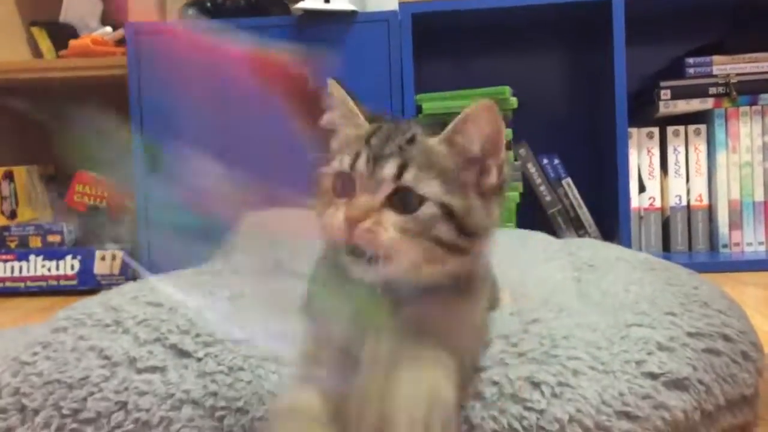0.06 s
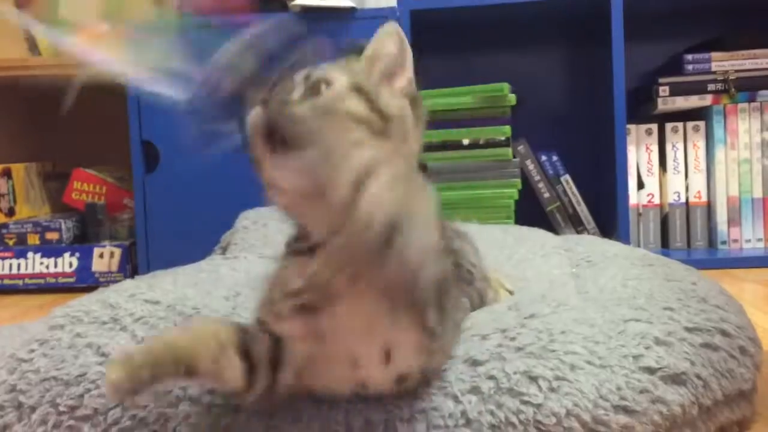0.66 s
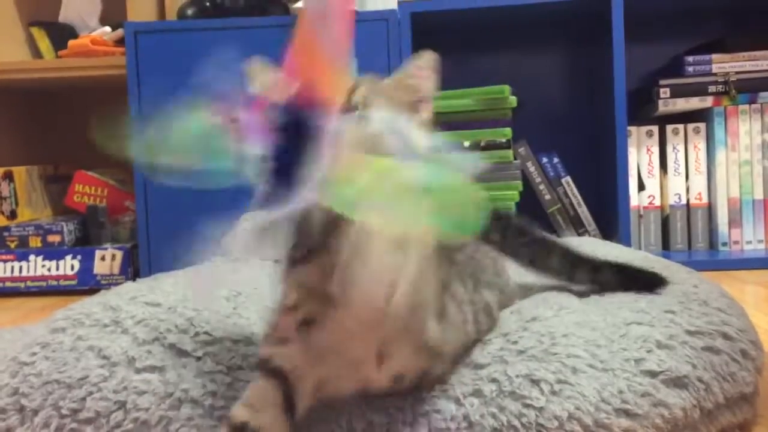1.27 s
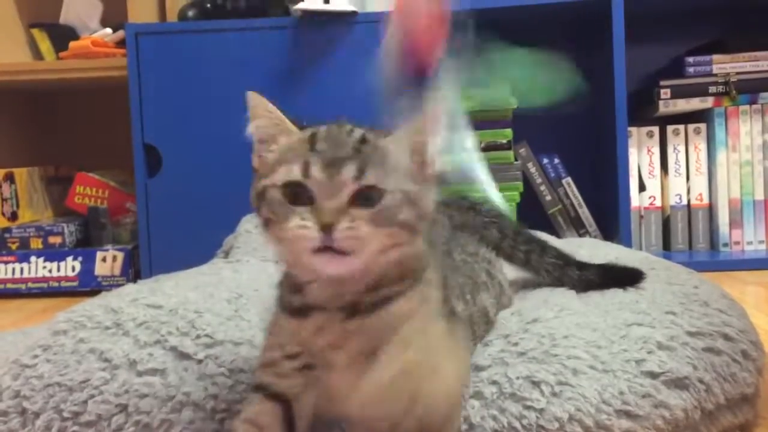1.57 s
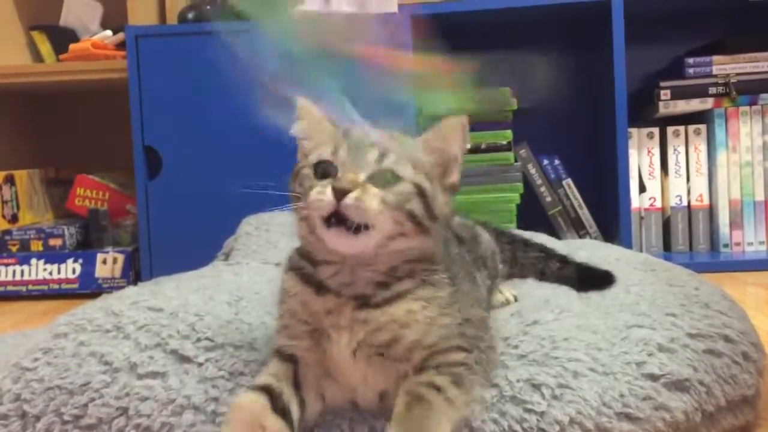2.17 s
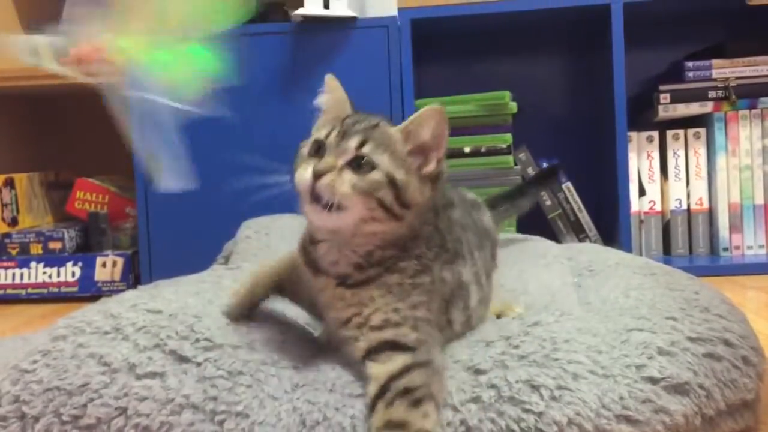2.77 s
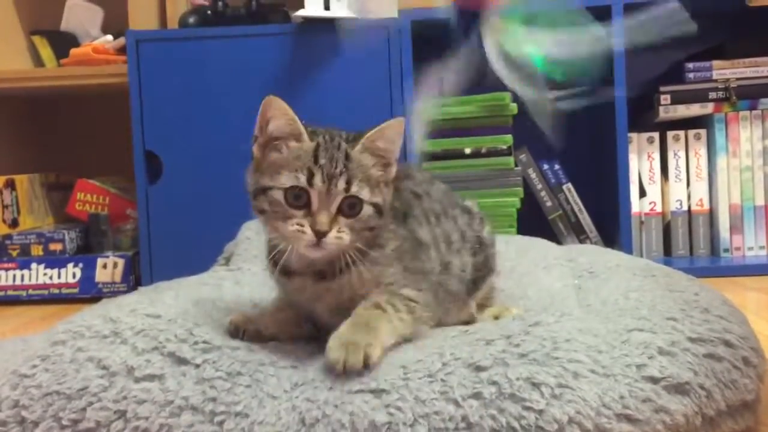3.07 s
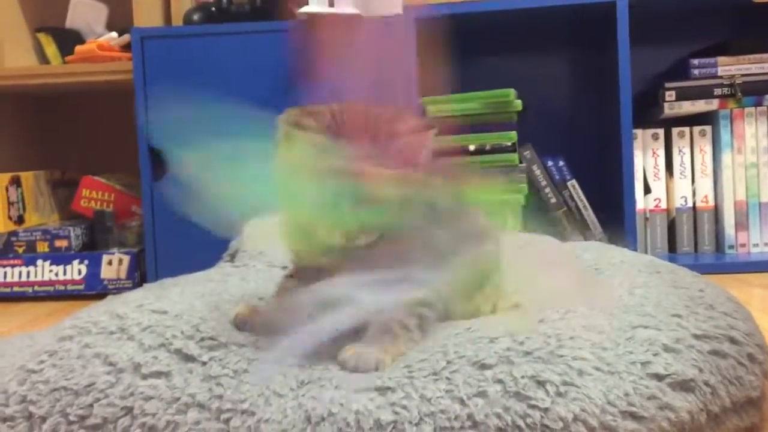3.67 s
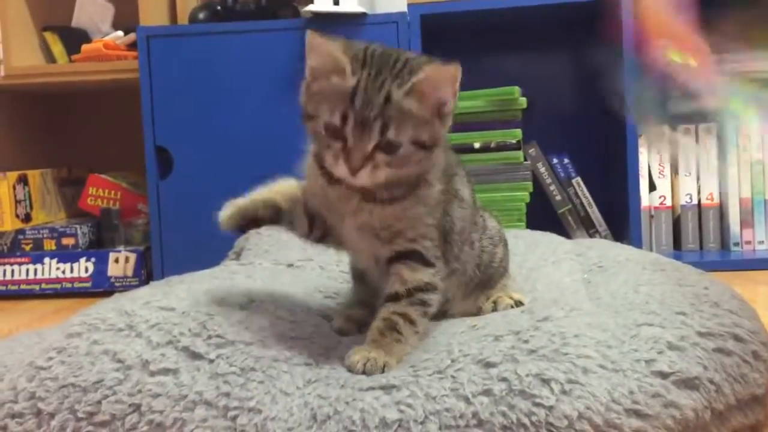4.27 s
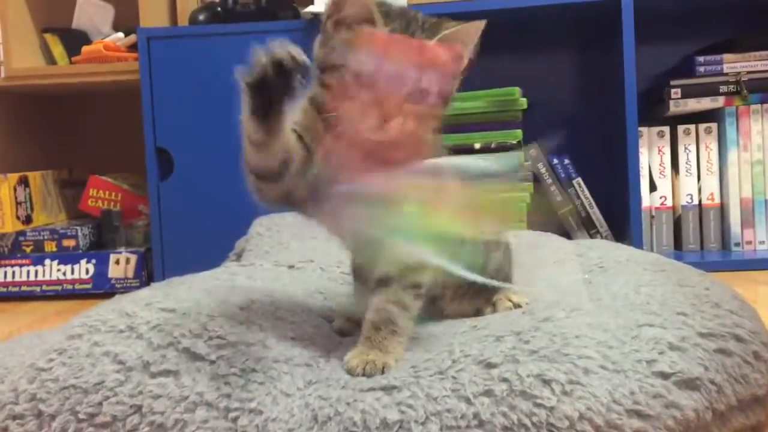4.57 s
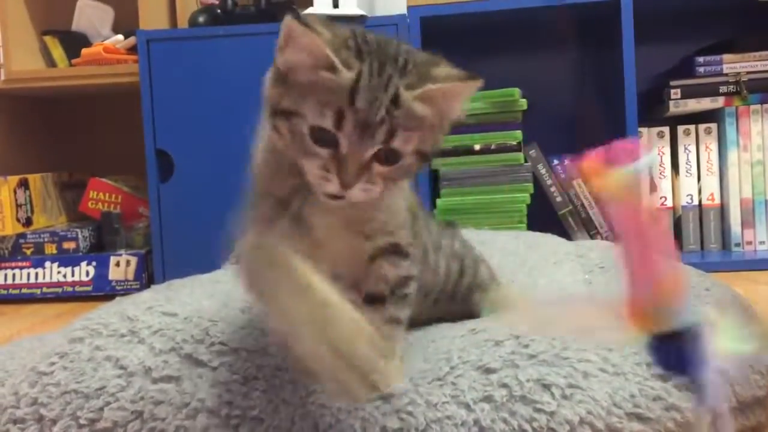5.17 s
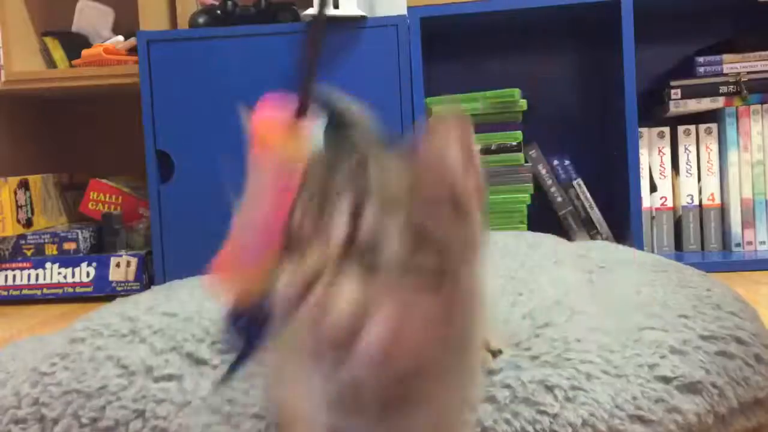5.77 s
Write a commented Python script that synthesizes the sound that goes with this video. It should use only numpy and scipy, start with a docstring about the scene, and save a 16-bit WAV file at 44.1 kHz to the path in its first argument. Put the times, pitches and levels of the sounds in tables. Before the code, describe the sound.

A feathered foil wand toy swishes and crinkles in bursts as a kitten bats it, with light clicks and soft paw pats.

```python
"""A crisp swish of foil comes first: a feathered wand toy with thin streamers, swung over a kitten.
Each swing crumples the streamers, single folds snap and hard parts click; then the streamers slide
and settle. Underneath, the kitten's paws pat and scuff on a plush cushion. One microphone, close to
the play in a small furnished room, with a quiet rumble and mains hum behind it."""
import sys
import numpy as np
from scipy import signal
from scipy.fft import rfft, irfft, next_fast_len
from scipy.io import wavfile
from scipy.ndimage import uniform_filter1d, map_coordinates

SR = 44100
rng = np.random.default_rng(int(sys.argv[2]) if len(sys.argv) > 2 else 0)


def to_wav(s):
    """Save 16-bit WAV."""
    ch = np.atleast_2d(s).T  # columns
    pcm = np.round(np.clip(ch, -1, 1) * 32767)  # PCM
    wavfile.write(sys.argv[1], SR, pcm.astype(np.int16))


N = 257103


def amp(db):
    """Decibels to gain."""
    return 10 ** (np.asarray(db) / 20)


def unit(x):
    """x at rms 1."""
    return x / np.sqrt(np.mean(x ** 2) + 1e-20)


def along(points, hz):
    """(Hz, value) points read on a log axis."""
    f, v = np.transpose(points)
    return np.interp(np.log(hz + 1), np.log(f), v)


def hump(hz, centre_hz, octaves):
    """A spectral peak that halves in gain the given octaves from its centre."""
    return 1 / (1 + (np.log2((hz + 1) / centre_hz) / octaves) ** 2)


def filtered(x, response):
    """x through a gain that depends on frequency."""
    n = x.shape[-1]
    padded = next_fast_len(n + 4096)
    return irfft(rfft(x, padded) * response(np.fft.rfftfreq(padded, 1 / SR)), padded)[..., :n]


def add(track, s, sound):
    """Mix a sound into the track from time s on."""
    i = round(s * SR)
    part = sound[max(-i, 0):max(N - i, 0)]
    track[max(i, 0):max(i, 0) + len(part)] += part


def swell(rise, fall):
    """An envelope and the time of its peak; rise and fall are the seconds for 20 dB either side."""
    lead = 2 * max(rise, 1 / SR)
    t = np.arange(-lead, 3 * abs(fall) + .002, 1 / SR)
    return amp(-20 * np.where(t < 0, np.abs(t / rise) ** 1.07, t / fall)), lead


def wobble(rate):
    """A smooth random curve, rate knots a second."""
    return map_coordinates(rng.standard_normal(1024), [np.arange(N) * rate / SR], mode="mirror")


def crackle(n, rate, spread_db, friction):
    """Tiny buckles of very unequal size at random moments, over smooth friction noise."""
    impulses = (rng.random(n) < rate / SR) * rng.choice([-1, 1], n)
    sizes = amp(spread_db * rng.standard_normal(n).clip(-2, 2))
    return unit(unit(impulses * sizes) + friction * rng.standard_normal(n))


# Room tone at the microphone. Each row: frequency in Hz, relative level in dB.
ROOM_TONE = [(12, -57), (20, -37), (40, -5), (65, -5.5), (187, -9.5), (216, -13), (262, -9), (301, -16),
             (337, -17), (434, -22), (527, -19), (590, -21.5), (5080, -36), (8890, -38), (16000, -37.5)]


def background():
    """Room rumble, microphone hiss and a faint 60 Hz mains hum."""
    air = unit(filtered(rng.standard_normal(N), lambda hz: amp(along(ROOM_TONE, hz))))
    hum = np.sin(2 * np.pi * 60 * np.arange(N) / SR)
    return amp(-67.5) * air + amp(-78) * hum


# The small room's short decay. Each row: frequency in Hz, seconds to fall 60 dB.
ROOM_DECAY = [(200, 0.27), (1500, 0.2), (5000, 0.12), (14000, 0.17)]


def room(x, stretches=16):
    """Nearby shelves and walls answer differently as the toy moves; the treble dies first."""
    out = np.zeros(N)
    for piece in np.array_split(np.arange(N), stretches):
        hz, t, noise = signal.stft(rng.standard_normal(SR // 3), SR, nperseg=256)
        decay = amp(-60 * t / along(ROOM_DECAY, hz)[:, None])
        tail = signal.istft(noise * decay, SR, nperseg=256)[1]
        add(out, piece[0] / SR + .003, signal.fftconvolve(x[piece], tail / np.linalg.norm(tail)))
    return out


# Low rumble from the cushion. Each row: frequency in Hz, relative level in dB.
CUSHION_RUMBLE = [(30, -28.5), (60, 6), (100, -5), (200, -6.5), (500, -50), (2000, -83)]


def shuffle(stir_db):
    """The kitten shifts its weight as it goes for the toy: a faint rumble that follows the foil."""
    rumble = unit(filtered(rng.standard_normal(N), lambda hz: amp(along(CUSHION_RUMBLE, hz))))
    effort_db = .5 * (uniform_filter1d(stir_db, size=6600) + 44.5)
    return amp(-67.5 + effort_db) * rumble


# Resonances of a scuff. Each row: frequency in Hz, width in Hz, relative level in dB.
PLUSH_MODES = [(175, 105, -4), (356, 45, 0), (677, 82, -3.5), (820, 80, 0), (1410, 460, -13)]
# Paws dragging through the plush. Each row: peak time in seconds, level in dB, rise and fall in seconds.
PAW_SCUFFS = [(.768, -51.5, .03, 0.056), (.815, -48, 0.037, 0.075), (5.762, -48, .02, 0.1),
              (5.825, -50.5, 0.018, 0.045)]


def scuffs():
    """Claws catch and slip in the pile of the cushion."""
    def plush(hz):
        modes = sum((-1) ** k * amp(db) * 1j * hz * width / (centre ** 2 - hz ** 2 + 1j * hz * width)
                    for k, (centre, width, db) in enumerate(PLUSH_MODES))
        return modes / (1 + (hz / 2200) ** 4)

    out = np.zeros(N)
    for s, db, rise, fall in PAW_SCUFFS:
        shape, lead = swell(rise, fall)
        slips = crackle(len(shape), rate=400, spread_db=4, friction=.6)
        add(out, s - lead, amp(db) * shape * unit(filtered(slips, plush)))
    return out


# Paws and toy landing on the cushion. Each row: time in seconds, relative level in dB, pitch in Hz.
CUSHION_PATS = [(0.111, -56, 180), (0.223, -51.5, 223), (0.328, -50.5, 125), (0.954, -55, 258),
                (1.154, -55, 102), (1.349, -46, 160), (1.384, -52, 105), (1.472, -48.5, 270),
                (3.892, -53.5, 254), (4.314, -56.5, 121), (4.364, -54, 110), (4.444, -51, 162),
                (4.478, -56, 102), (5.261, -54, 129), (5.608, -52.5, 102)]


def pats():
    """The cushion swallows each blow, leaving a dull puff around one low pitch."""
    out = np.zeros(N)
    shape, lead = swell(rise=.008, fall=.049)
    for s, db, pitch_hz in CUSHION_PATS:
        puff = unit(filtered(rng.standard_normal(len(shape)), lambda hz: hump(hz, pitch_hz, .42)))
        add(out, s + .005 - lead, amp(db - 5) * shape * puff)
    return out


def knock(s, db, pitch_hz, t60):
    """The hollow plastic body of the toy rings briefly as the string jerks it."""
    out, t = np.zeros(N), np.arange(SR // 4) / SR
    add(out, s, amp(db - 60 * t / t60) * np.sin(2 * np.pi * pitch_hz * t))
    return out


# The foil's colour from close by. Each row: frequency in Hz, relative level in dB.
FOIL_COLOUR = [(40, -29), (150, 3), (400, 2.5), (750, -1), (1130, -.5), (1500, -1), (2800, -1), (5000, 0),
               (8000, 1.5), (12500, 0), (16000, -3.5)]


def facets(x, centre_hz, octaves):
    """Foil facets of many sizes radiate x as a broad hump; tighter folds sound higher."""
    return filtered(x, lambda hz: amp(along(FOIL_COLOUR, hz)) * hump(hz, centre_hz, octaves))


def flex(x, depth_db, frame):
    """A bending strip has resonances that last only moments; they recolour the sound at equal power."""
    spectra = signal.stft(x, nperseg=frame)[2]
    resonances = uniform_filter1d(rng.standard_normal(spectra.shape), 5, axis=0)
    resonances = uniform_filter1d(resonances, 3, axis=1)  # each lasts about three frames
    coloured = spectra * amp(depth_db * unit(resonances))
    coloured *= np.linalg.norm(spectra, axis=0) / (np.linalg.norm(coloured, axis=0) + 1e-12)
    return signal.istft(coloured, nperseg=frame)[1][:N]


def ticks(stir_db, rate, db, centre_hz):
    """The thin tips of the streamers flick each other: tiny, very high ticks."""
    out = np.zeros(N)
    shape, lead = swell(rise=.00024, fall=.0018)
    for when, pitch, size in rng.random((int(rate * N / SR), 3)):
        flick = shape * rng.standard_normal(len(shape))
        tick = facets(flick, centre_hz * 2 ** (pitch - .5), octaves=.78)
        add(out, when * N / SR, amp(stir_db[int(when * N)] + db) * size ** 2 * tick)
    return out


def zips(stir_db, rate, db, low_hz, high_hz, mean_s):
    """One edge runs along another, speeding up or slowing down: a short rough chirp."""
    out = np.zeros(N)
    for when, pitch, life, size, way in rng.random((int(rate * N / SR), 5)):
        progress = np.linspace(0, 1, int(SR * mean_s * (.5 + life)))
        speed = np.sin(np.pi / 2 * (progress if way < .65 else 1 - progress))
        hz = (low_hz + (high_hz - low_hz) * speed) * 4 ** (pitch - .5)  # up to an octave either way
        rough_hz = hz * (1 + .29 * rng.standard_normal(len(hz)))
        chirp = np.sin(np.pi * progress) * np.sin(2 * np.pi * np.cumsum(rough_hz) / SR)
        add(out, when * N / SR, amp(stir_db[int(when * N)] + db) * size * chirp)
    return out


# Steady rubbing, strong while the kitten is at the toy. Each row: time in seconds, level in dB.
RUBBING = [(0.0, -65), (0.45, -56), (0.63, -57), (0.78, -74), (0.88, -59), (1.0, -58), (1.21, -56),
           (1.26, -71), (1.42, -52), (1.58, -72), (2.38, -74), (2.78, -78), (3.5, -78), (4.3, -72),
           (4.93, -74), (5.1, -63), (5.48, -62), (5.83, -57)]


def sliding_db():
    """How hard the streamers slide: steady rubbing plus the settling after each swish."""
    power = amp(np.interp(np.arange(N) / SR, *np.transpose(RUBBING))) ** 2
    settling, lead = swell(rise=.028, fall=.058)
    for s, db, _, _ in WAND_SWINGS:
        add(power, s - lead, (amp(db - 15.6) * settling) ** 2)
    flutter_db = 2.5 * wobble(rate=70)  # the streamers catch and let go
    return 10 * np.log10(power) + flutter_db


def sliding(level_db, centre_hz):
    """Loose streamers rub and tick; the colour glides with the tightness of their folds."""
    grains = crackle(N, rate=900, spread_db=6, friction=.72)
    out = np.zeros(N)
    for band_hz in 500 * 2 ** np.arange(6):
        share = np.maximum(1 - np.abs(np.log2(centre_hz / band_hz)), 0)
        out += share * unit(facets(grains, band_hz, octaves=1.15))
    return amp(level_db) * out


# Sharp clicks from the toy. Each row: peak time in seconds, relative level in dB, centre in Hz.
TOY_CLICKS = [(0.0957, -35, 5500), (0.3046, -33, 6500), (0.5852, -32.0, 7500), (0.6985, -51, 7500),
              (0.9014, -40.0, 11000), (0.9629, -31.0, 11000), (1.149, -37.5, 4300), (1.6877, -41.0, 6000),
              (1.8601, -44.5, 9000), (2.0003, -43.5, 11000), (2.2054, -38.0, 10000), (2.9033, -49.0, 5000),
              (3.1304, -54.0, 7500), (4.2026, -35.5, 4200), (4.2259, -34.0, 7500), (4.2821, -51.5, 7500),
              (4.3129, -32.5, 5800), (4.3875, -52, 7500), (4.4511, -30.5, 4600), (4.6958, -27.5, 5800),
              (5.1598, -38.0, 3500), (5.1853, -40.0, 3500), (5.2597, -37.5, 4500), (5.4028, -37.0, 7500),
              (5.4472, -39.0, 12500), (5.5782, -41.5, 12000), (5.6269, -41.0, 7500), (5.7292, -34.0, 5200)]


def clicks(octaves=1.2, rise=.0004, fall=.0026):
    """Hard plastic parts and taut streamer tips click: very sudden bursts for crinkles()."""
    return [(s, db + 1, hz, octaves, rise, fall) for s, db, hz in TOY_CLICKS]


# Single folds popping. Each row: peak time in seconds, relative level in dB, centre in Hz,
# spread in octaves.
FOLD_SNAPS = [(0.0984, -29.0, 4700, 0.97), (0.1176, -22.0, 5400, 0.91), (0.1356, -31.5, 3100, 1.43),
              (0.2003, -37.5, 5100, 1.02), (0.2264, -27, 4400, 0.58), (0.235, -32, 4200, 0.7),
              (0.3049, -32.0, 2500, 1.26), (0.3267, -22.5, 5300, 1.27), (0.349, -32, 4000, 1.1),
              (0.4921, -28.5, 7600, 1.24), (0.5865, -33.5, 6900, 1.41), (0.6199, -39.0, 3700, 0.85),
              (0.7398, -44.0, 3100, 0.82), (0.7538, -44.0, 4000, 0.45), (0.853, -38.5, 4100, 0.96),
              (0.995, -39.5, 3800, 0.54), (1.0751, -31.0, 3700, 0.65), (1.0882, -28.5, 6500, 0.91),
              (1.1173, -29.5, 4500, 0.88), (1.1489, -41.0, 3900, 0.54), (1.2058, -39.0, 3500, 1.62),
              (1.2779, -51.0, 3400, 0.48), (1.3518, -30.0, 7800, 1.17), (1.358, -32, 5500, 1.2),
              (1.3889, -33.5, 5100, 0.85), (1.4108, -35.5, 3400, 0.82), (1.477, -25.5, 7000, 1.2),
              (1.7416, -41.0, 3500, 0.61), (1.7638, -44.0, 4300, 0.33), (1.8444, -39.0, 3400, 0.65),
              (1.9669, -34, 5600, 0.47), (2.0501, -47.5, 4000, 0.39), (2.071, -43.0, 3300, 0.43),
              (2.167, -50, 3700, 0.3), (2.206, -39.5, 2800, 1.54), (2.298, -42.0, 3500, 0.34),
              (2.3268, -34.0, 3400, 0.63), (2.3717, -47.0, 11700, 1.25), (2.5279, -43.0, 3100, 0.65),
              (2.5679, -39.0, 3100, 0.39), (2.7168, -50, 4000, 0.3), (2.9025, -56, 2500, 1.3),
              (3.889, -44.5, 4000, 0.34), (3.9124, -39.5, 4800, 1.04), (4.0463, -50.5, 3000, 0.42),
              (4.2026, -38.0, 3100, 0.96), (4.2252, -38.0, 3100, 1.24), (4.2521, -46.5, 2200, 0.93),
              (4.3167, -30.5, 4400, 0.61), (4.4375, -50.0, 3900, 0.56), (4.452, -31.0, 3900, 0.95),
              (4.6954, -33.5, 5600, 2.0), (4.9807, -43.0, 2700, 0.42), (5.0708, -33.5, 4200, 0.86),
              (5.1592, -40.0, 2300, 1.27), (5.1851, -42.5, 2300, 1.13), (5.2589, -37.5, 3100, 1.33),
              (5.5135, -44.5, 5800, 0.38), (5.528, -43, 2400, 0.5), (5.685, -44, 2350, 1),
              (5.73, -36.5, 3700, 1.25)]


def snaps():
    """A fold pops as the toy is jerked or swatted: short bursts for crinkles()."""
    bursts = []
    for s, db, hz, octaves in FOLD_SNAPS:
        height = hz / 4200
        rise = .003 * height ** .5 / octaves ** .3  # low, broad snaps start most suddenly
        fall = .0088 / height ** .36  # high ones die sooner
        bursts.append((s, db + 1.7, hz, octaves, rise, fall))
    return bursts


# Swings of the wand over the cushion, close to the microphone. Each row: peak time in seconds,
# relative level in dB, centre in Hz, seconds to fall 20 dB.
WAND_SWINGS = [(0.027, -31.0, 4400, 0.013), (0.112, -35.0, 2800, 0.042), (0.231, -40.0, 2800, 0.055),
               (0.343, -30.0, 4600, 0.023), (0.43, -51.5, 7400, 0.092), (0.509, -39.5, 3800, 0.059),
               (0.598, -45.0, 3200, 0.019), (0.93, -44.5, 3800, 0.031), (0.979, -50.5, 2900, 0.021),
               (1.094, -42.5, 3500, 0.104), (1.184, -44.0, 2900, 0.061), (1.298, -50.5, 2100, 0.014),
               (1.36, -38.0, 2700, 0.048), (1.473, -27.5, 9100, 0.026), (1.517, -44.5, 4800, 0.042),
               (1.626, -48.5, 3600, 0.069), (1.763, -56.5, 2200, 0.117), (1.87, -51.5, 3100, 0.08),
               (1.981, -38.0, 4000, 0.019), (2.088, -48.5, 2400, 0.036), (2.15, -55.5, 2000, 0.051),
               (2.341, -52.0, 2000, 0.091), (2.425, -43.0, 2400, 0.037), (2.553, -58.0, 2500, 0.061),
               (2.662, -64.5, 1600, 0.117), (3.184, -51, 1400, 0.014), (3.339, -67, 4500, 0.013),
               (3.585, -45.5, 3300, 0.023), (3.637, -46.0, 2600, 0.016), (3.739, -51.5, 2000, 0.019),
               (3.945, -49.0, 2700, 0.037), (4.07, -60.0, 1900, 0.056), (4.108, -52.5, 1600, 0.015),
               (4.223, -54.5, 1700, 0.053), (4.338, -50.0, 2300, 0.088), (4.472, -41.5, 3600, 0.038),
               (4.577, -38.0, 3700, 0.043), (4.712, -41.0, 2500, 0.035), (4.844, -47.5, 2500, 0.056),
               (5.011, -43.0, 3200, 0.056), (5.045, -29.5, 5000, 0.014), (5.176, -47.5, 3200, 0.01),
               (5.283, -24, 5800, 0.021), (5.373, -50.0, 2700, 0.03), (5.45, -45.5, 12400, 0.026),
               (5.537, -47, 2300, 0.035), (5.589, -45.0, 2300, 0.017), (5.633, -47.0, 3600, 0.037),
               (5.701, -50, 2200, 0.08), (5.829, -39.0, 2300, 0.033)]


def swishes(octaves=1.12):
    """Each swing crumples the foil: a broad burst that builds a little faster than it dies."""
    return [(s, db - .1, hz, octaves, .82 * fall, fall) for s, db, hz, fall in WAND_SWINGS]


def folds(per_s=55, scatter_db=2.2, scatter_octaves=.4, octaves=.28, rise=.0017, fall=.006):
    """Small folds give way at random moments of each swish: narrow bursts, each at its own pitch."""
    bursts = []
    for s, db, hz, length in WAND_SWINGS:
        draws = rng.standard_normal((12, 3)).clip(-1.7, 1.7)
        for when, size, pitch in draws[:round(per_s * length)]:
            fold_db = db - .5 - 10 * abs(when) + scatter_db * size  # weaker away from the peak
            fold_hz = hz * 2 ** (scatter_octaves * pitch)
            bursts.append((s + length * when / 2, fold_db, fold_hz, octaves, rise, fall))
    return bursts


def crinkles(bursts):
    """Each burst is an avalanche of buckles in the foil; a sudden one opens with a bright edge."""
    out = np.zeros(N)
    edge_shape, edge_lead = swell(rise=.0003, fall=.0018)
    for s, db, centre_hz, octaves, rise, fall in bursts:
        shape, lead = swell(rise, fall)
        sudden = 1 / (1 + (rise / .0018) ** 2)
        # in a slow crumple one buckle trips its neighbours, so they come in clumps
        clumping = unit(uniform_filter1d(rng.standard_normal(len(shape)), size=70))
        clumps = amp(2.2 * (1 - sudden) * clumping)
        buckles = crackle(len(shape), rate=7000, spread_db=3.5, friction=.67)
        crumple = unit(facets(shape * clumps * buckles, centre_hz, octaves))
        add(out, s - lead, amp(db) * crumple * np.sqrt(np.mean(shape ** 2)))
        edge = facets(edge_shape * rng.standard_normal(len(edge_shape)), centre_hz=11000, octaves=1)
        add(out, s - edge_lead, amp(db + 3.5) * sudden * min(octaves, 1) ** 2 * edge)
    return out


def scene():
    """Toy and kitten close to one microphone, the room's reflections well below the direct sound."""
    slide_db = sliding_db()
    slide_hz = 2000 * 2 ** (.25 * wobble(rate=12))
    bursts = swishes() + snaps() + clicks() + folds()
    # a hard flick works many strips at once, which evens out their resonances
    foil = flex(crinkles(bursts), depth_db=2.3, frame=256)
    foil += flex(sliding(slide_db, slide_hz), depth_db=5, frame=384)
    # the busier the foil, the stronger its chirps and ticks; single snaps hardly count
    power = np.abs(uniform_filter1d(foil ** 2, size=220))
    stir_db = uniform_filter1d(10 * np.log10(power + 1e-8), size=2600)
    chirps = zips(stir_db, rate=55, db=3.5, low_hz=1300, high_hz=3300, mean_s=.009)
    tips = ticks(stir_db, rate=30, db=15, centre_hz=10000)
    toy = foil + chirps + tips + knock(s=3.182, db=-58.5, pitch_hz=1103, t60=.1)
    play = toy + pats() + scuffs() + shuffle(stir_db)
    return (play + amp(-11.5) * room(play) + background())[None]


def record(dry):
    """The camera's microphone channel cuts the deepest bass and keeps nothing above its band limit."""
    low_hz, top_hz = 33, 16000
    low_cut = lambda hz: (hz / low_hz) ** 4 / (1 + (hz / low_hz) ** 4)
    return filtered(dry, lambda hz: low_cut(hz) * (hz < top_hz))


dry = scene()
out = record(dry)
to_wav(out)
```